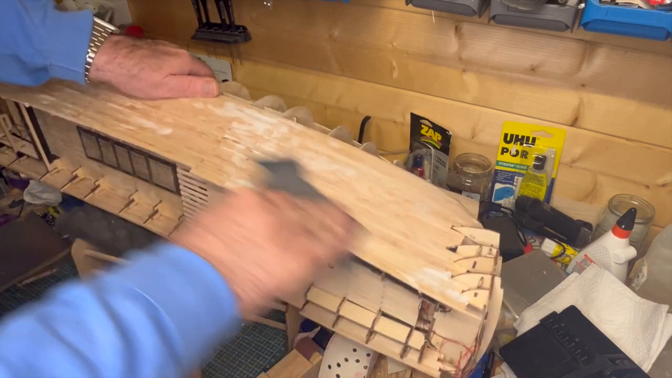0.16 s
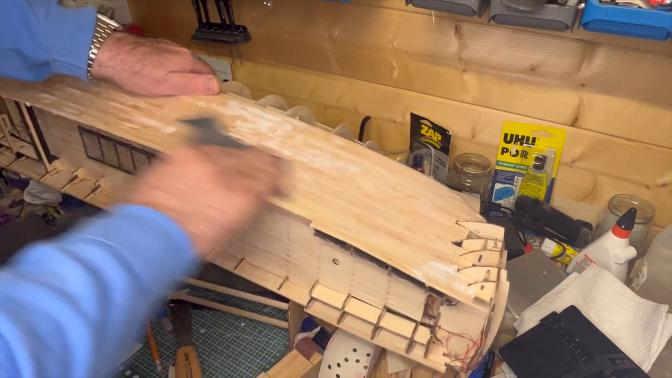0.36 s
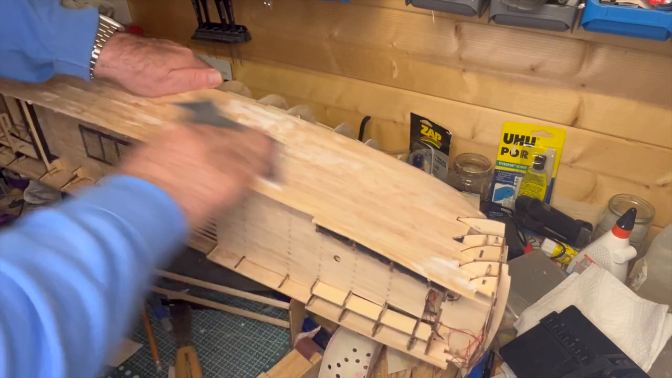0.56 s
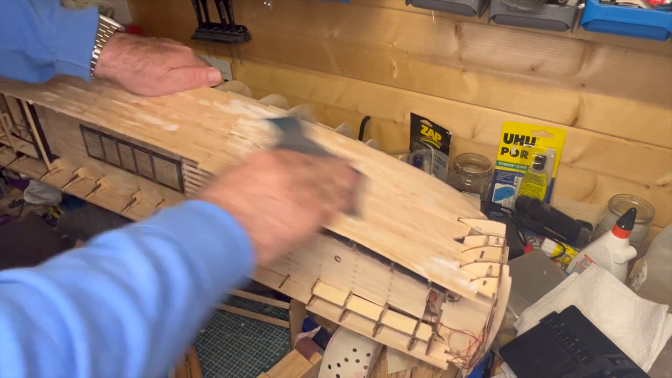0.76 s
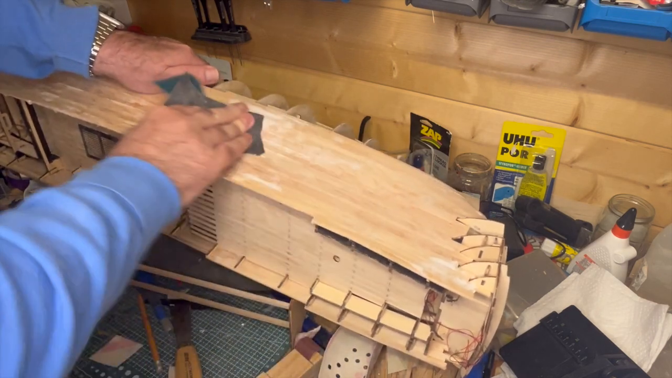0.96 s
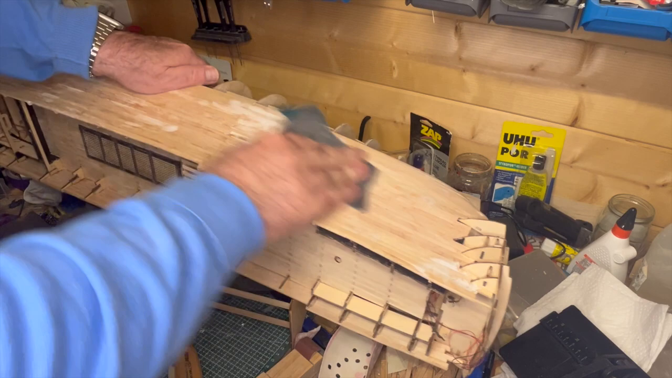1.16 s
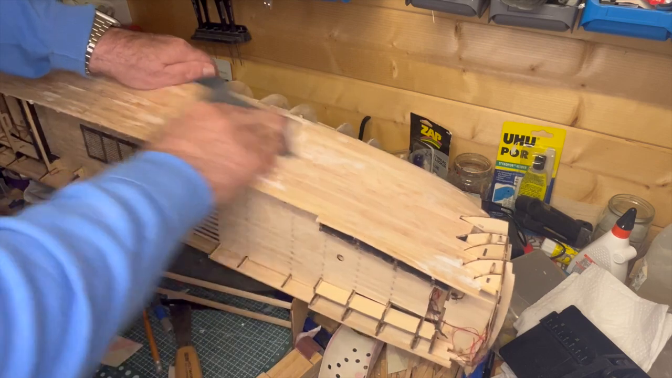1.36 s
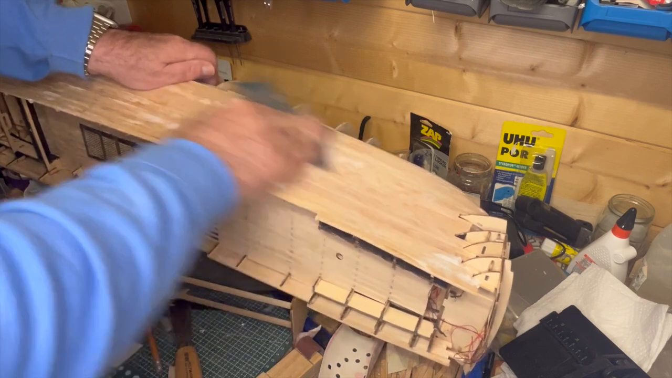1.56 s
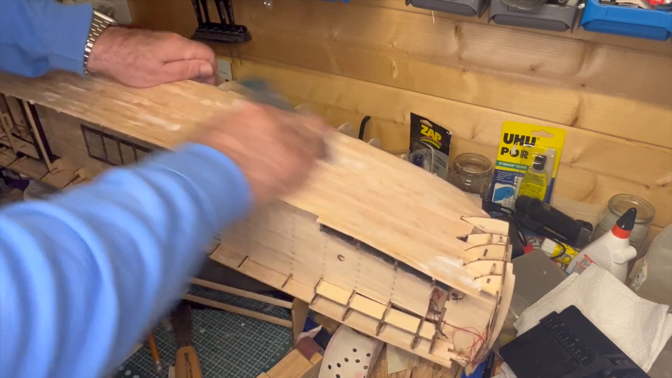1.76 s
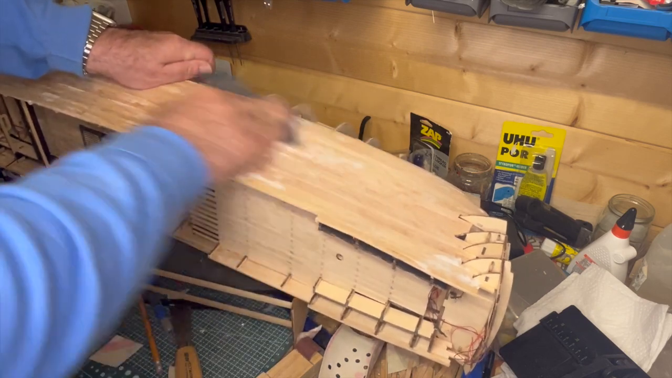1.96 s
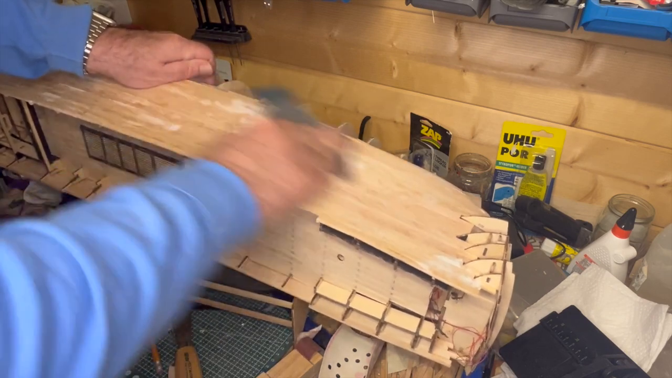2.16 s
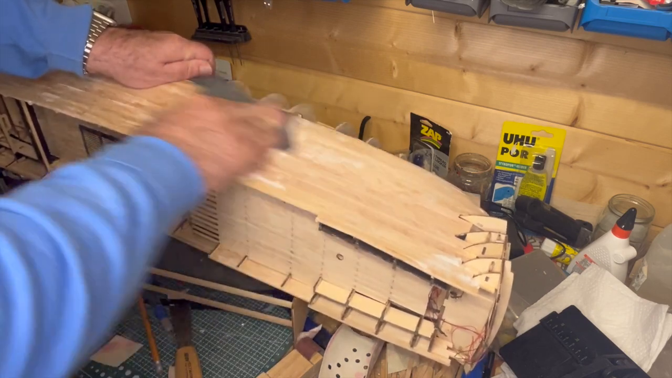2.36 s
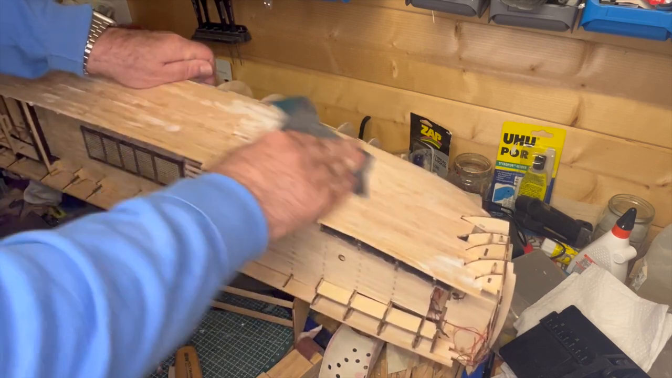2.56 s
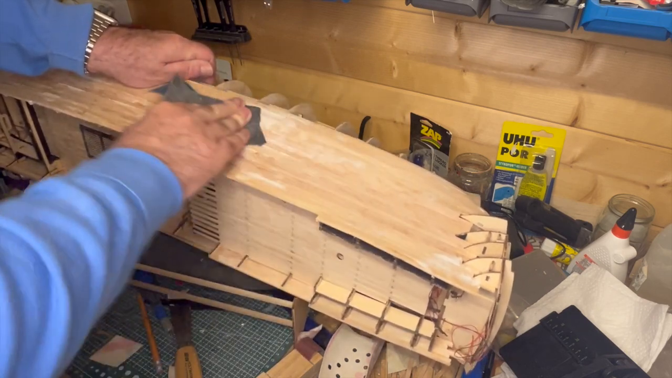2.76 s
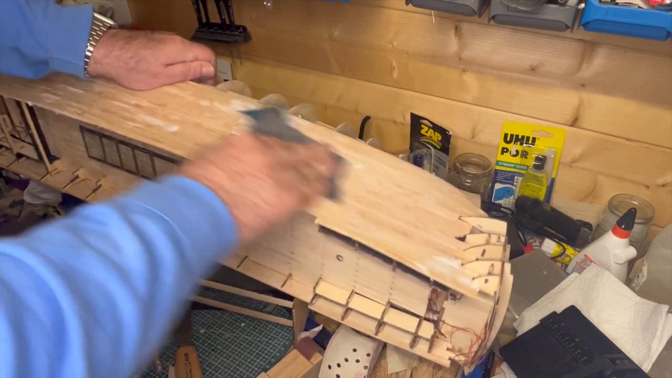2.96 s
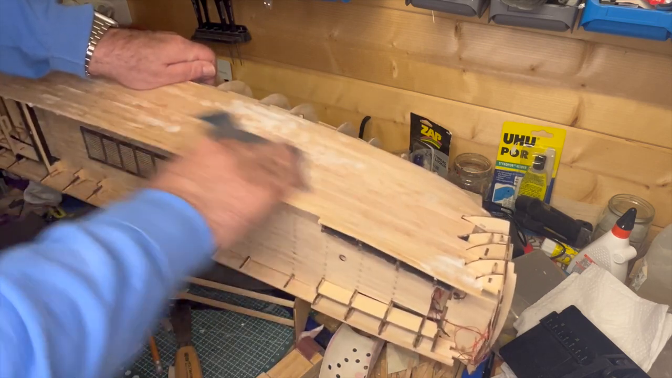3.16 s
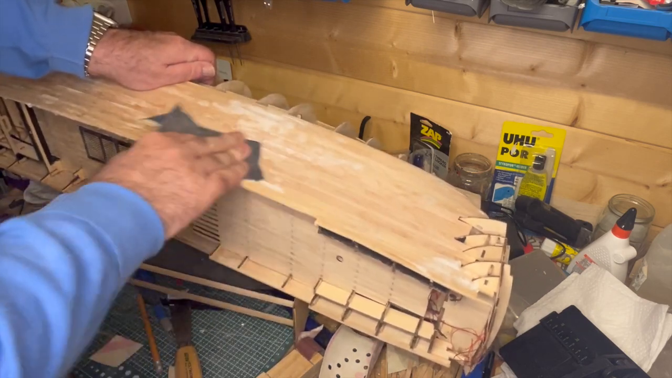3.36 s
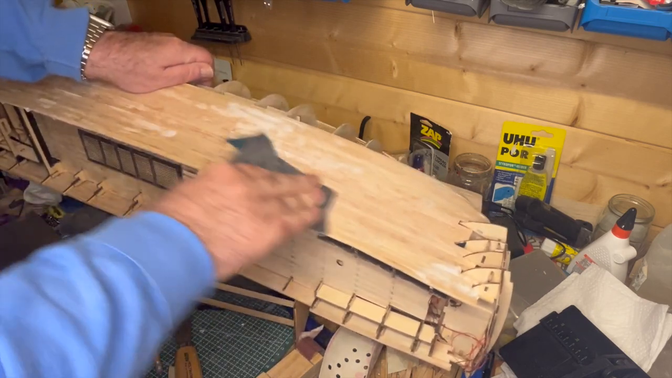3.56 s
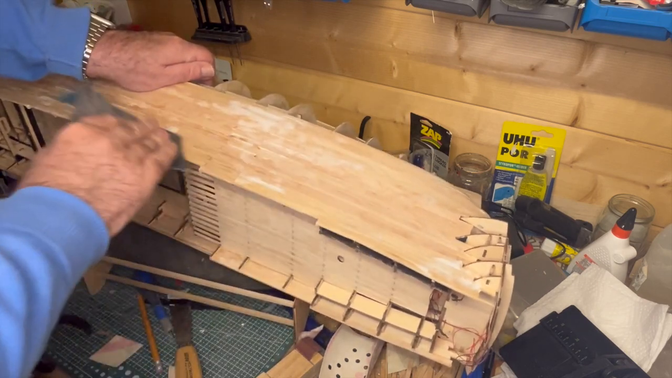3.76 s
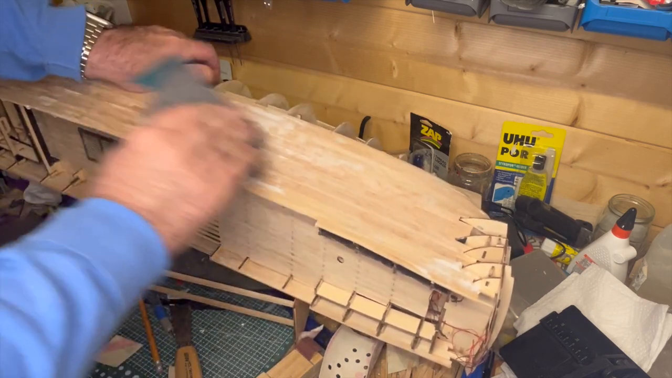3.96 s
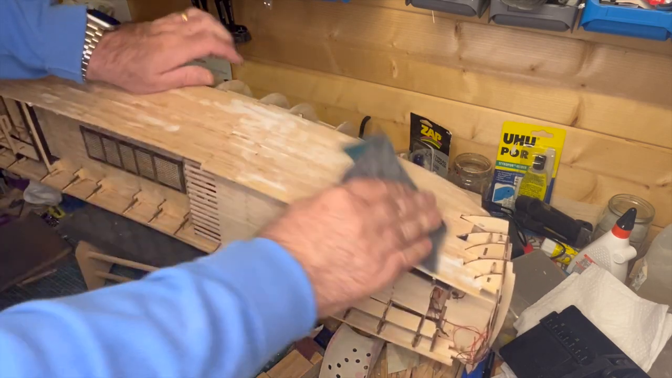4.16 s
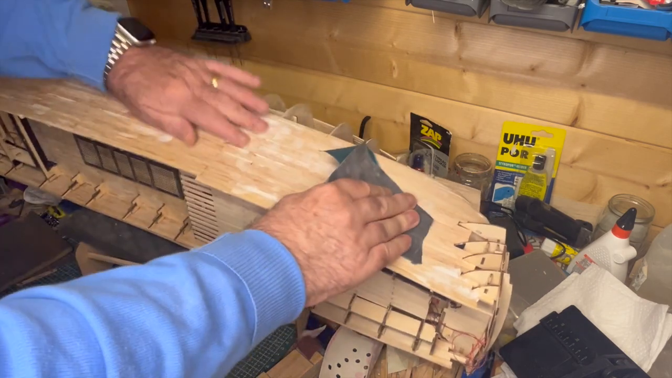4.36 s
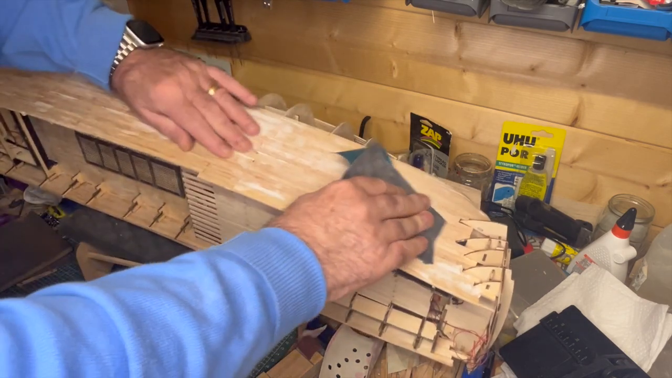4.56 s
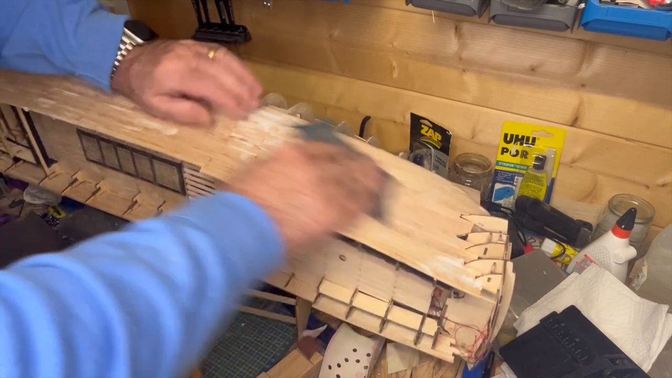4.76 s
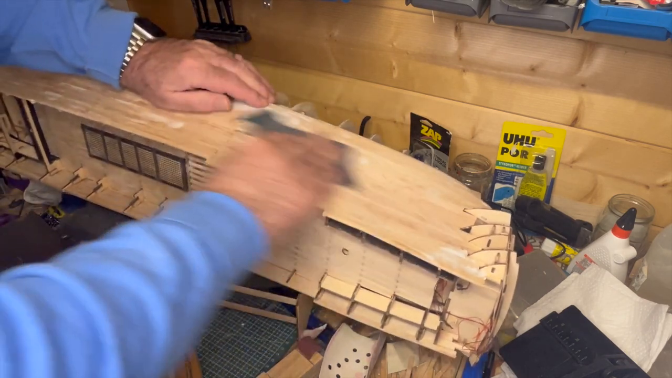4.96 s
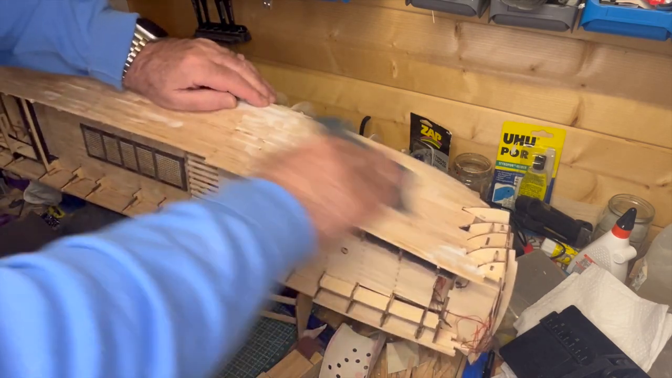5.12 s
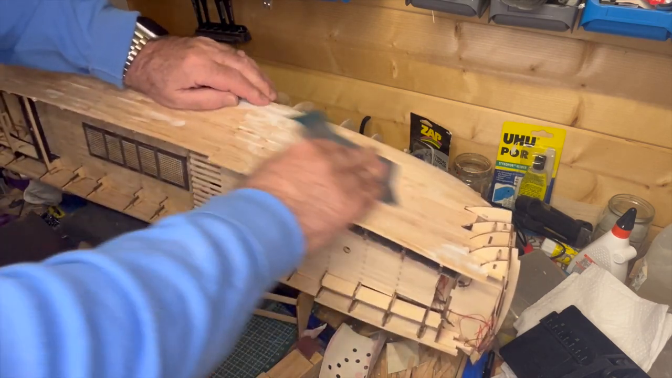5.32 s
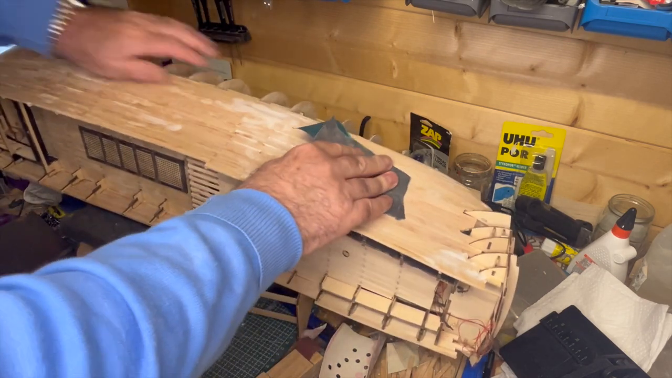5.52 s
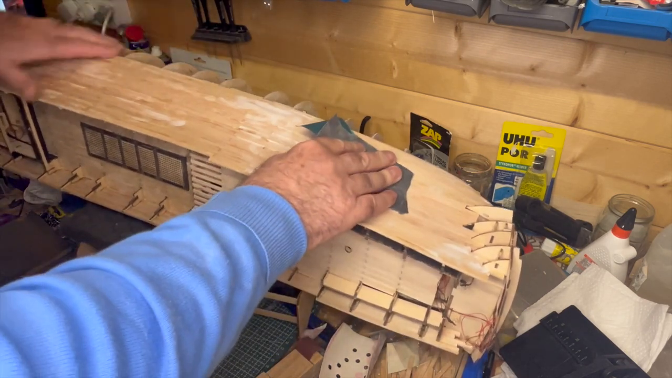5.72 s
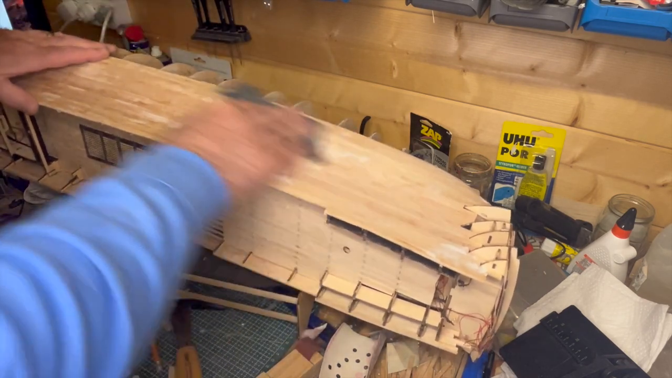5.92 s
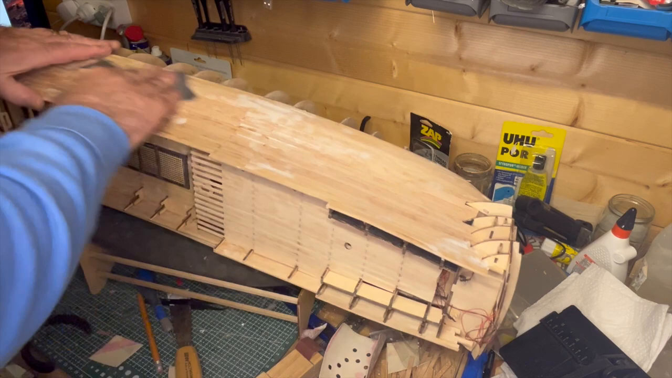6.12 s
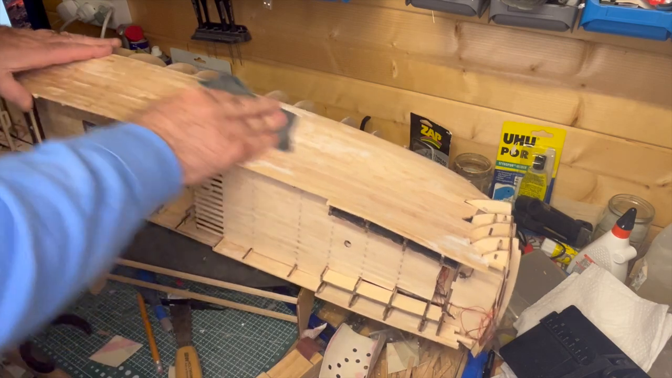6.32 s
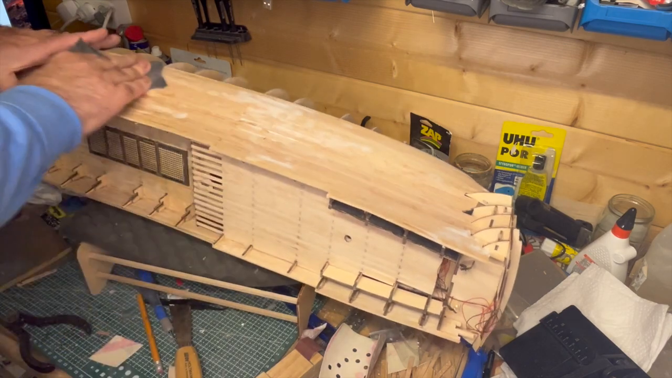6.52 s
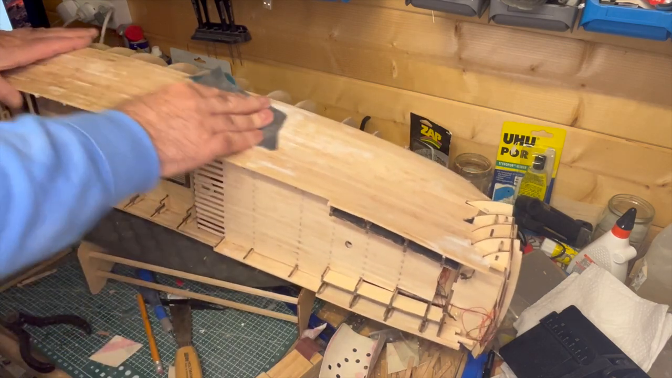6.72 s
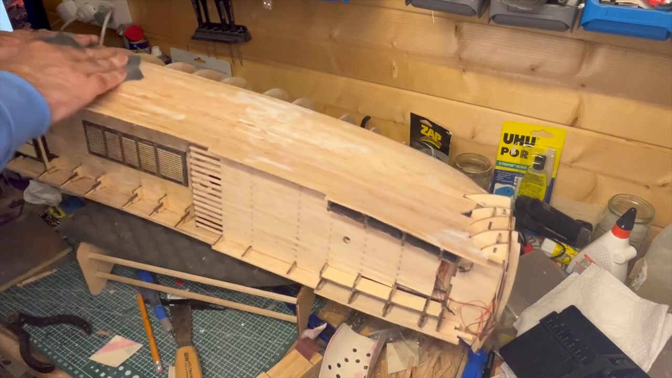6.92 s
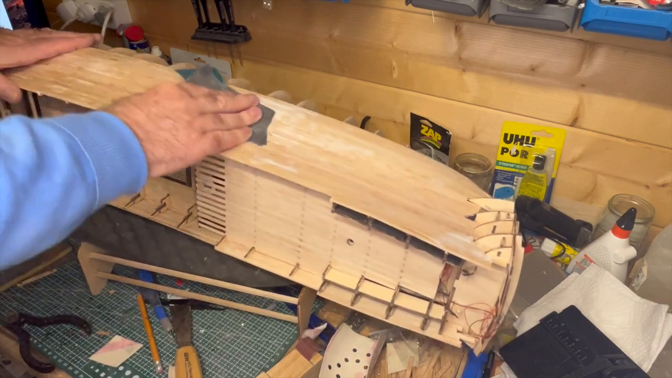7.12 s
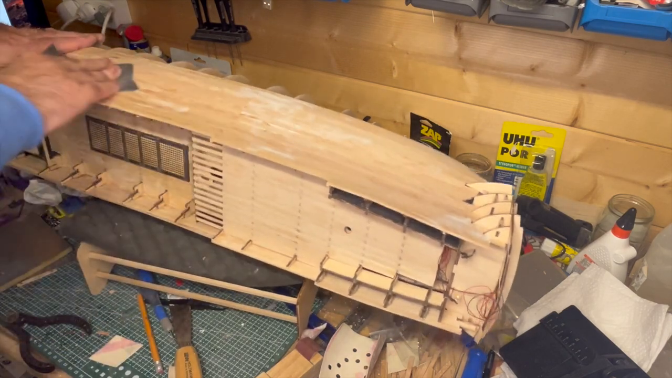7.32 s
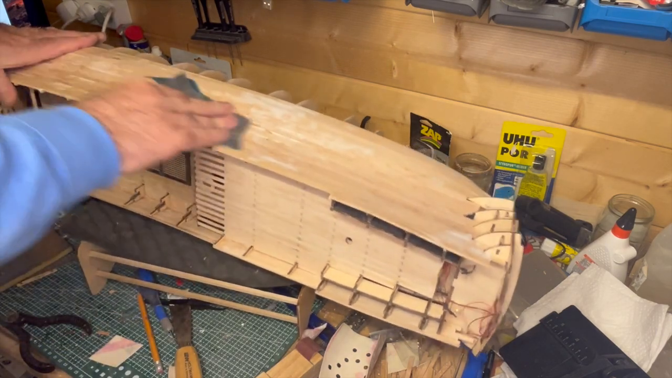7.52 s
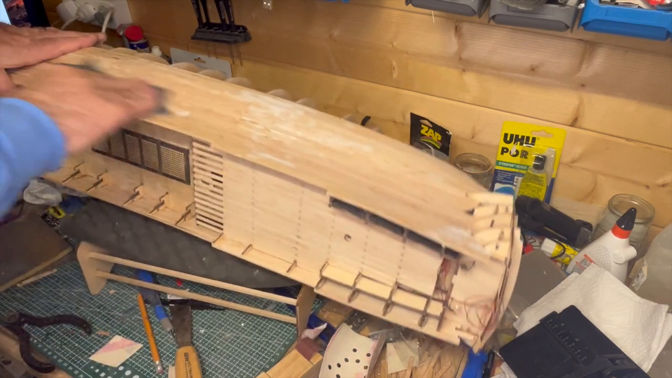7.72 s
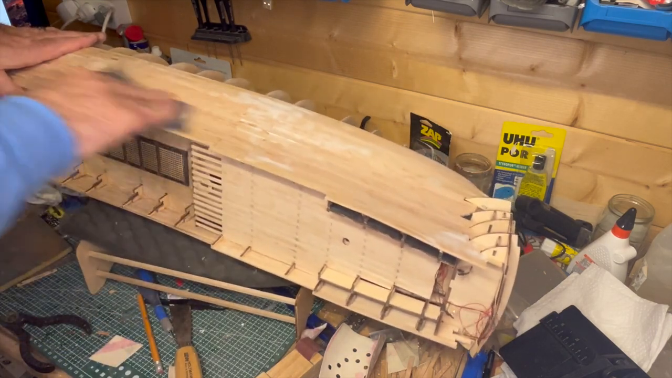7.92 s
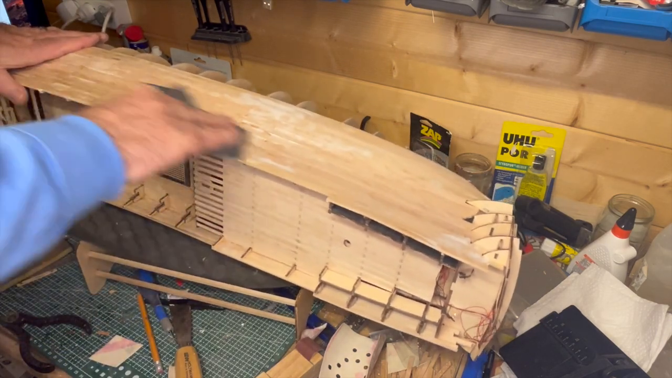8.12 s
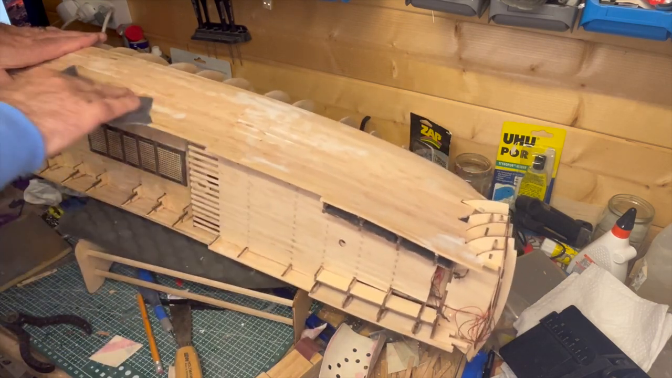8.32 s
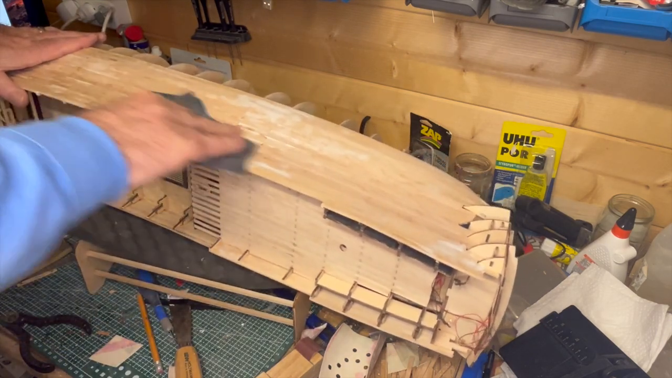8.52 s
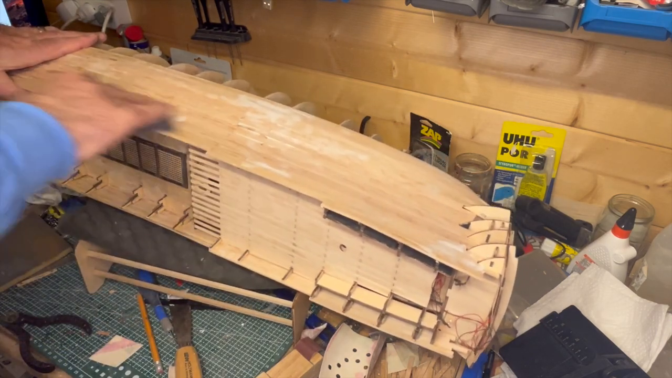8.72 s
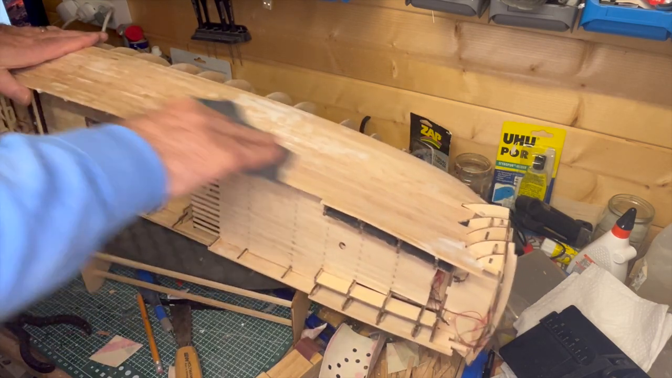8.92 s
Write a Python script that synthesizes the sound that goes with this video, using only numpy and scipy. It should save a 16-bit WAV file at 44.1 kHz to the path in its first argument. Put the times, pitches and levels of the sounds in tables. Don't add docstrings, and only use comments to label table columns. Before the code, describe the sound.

Dry, gritty hand sanding on thin hollow wood: brisk rhythmic swishes with small knocks, two near-silent breaks, then louder strokes that gradually weaken.

```python
import sys
import numpy as np
from scipy import signal
from scipy.fft import rfft, irfft, next_fast_len
from scipy.io import wavfile
from scipy.ndimage import uniform_filter1d, minimum_filter1d, map_coordinates

SR = 44100
rng = np.random.default_rng(int(sys.argv[2]) if len(sys.argv) > 2 else 0)


def convert_level_to_amplitude(level_db):
    exponent = np.asarray(level_db, float) / 20
    return 10 ** exponent


def transcribe(signal):
    frames = np.atleast_2d(signal).T
    limited = np.clip(frames, -1, 1)
    pcm = np.round(limited * 32767).astype(np.int16)
    wavfile.write(sys.argv[1], SR, pcm)


N = 400428

# resonance in Hz, width in Hz, level in dB
RIB_MODES = [(880, 360, 3.5), (1128, 130, 7.5), (1432, 298, 5)]
# resonance in Hz, width in Hz, level in dB
HOLLOW_MODES = [(374, 108, 0.5), (551, 89, 4.5), (764, 190, -3)]
# time in seconds, brightness in dB, contact with the ribs in dB,
# fold of the paper in dB, plank ring in Hz, sheet ring in Hz
HAND_GRIP = [(0.05, 6, -26.5, -8, 2975, 7000), (0.4, 8, -24.5, -4, 2660, 6260),
             (0.56, 3, -36, -9, 2375, 8790), (0.75, 6, -30.5, 0, 2310, 6860),
             (1.1, 10, -36, -9, 3484, 6500), (1.75, 12.5, -25, -18, 3260, 6900),
             (2.05, 8, -31, -19.5, 2453, 7750), (2.45, 11.5, -30.5, -16.5, 2797, 7170),
             (2.85, 4, -29.5, -14, 2260, 7770), (3.3, 1.5, -35.5, -36, 2250, 8520),
             (3.7, 6, -32.5, -31.5, 2690, 8850), (4.4, -7.5, -18, 11.5, 3180, 6330),
             (4.8, 5, -30, -4.5, 3050, 7070), (5.2, 4.5, -24, -11.5, 3225, 6120),
             (7.45, 4, -24, -16.5, 3157, 7250), (8.2, 4, -40, -11, 2830, 8050),
             (8.45, 8.5, -30.5, -5.5, 2726, 8220), (9.0, 6, -34.5, -2, 2175, 6660)]


def unit(x):
    return x / np.sqrt(np.mean(x ** 2) + 1e-20)


def along(points, hz):
    f, v = np.transpose(points)
    return np.interp(np.log(hz + 1), np.log(f + 1), v)


def curves(rows):
    s, *cols = np.transpose(rows)
    return [np.interp(np.arange(N) / SR, s, c) for c in cols]


def wobble(rate):
    return map_coordinates(rng.standard_normal(int(N * rate / SR) + 4), [np.arange(N) * rate / SR])


def filtered(x, response):
    m = next_fast_len(N + SR // 5, real=True)
    return irfft(rfft(x, m) * response(np.fft.rfftfreq(m, 1 / SR)), m)[:N]


def shaped_noise(x, spectrum):
    return unit(filtered(x, lambda hz: convert_level_to_amplitude(along(spectrum, hz))))


def modes(table):
    def response(f):
        total = 0
        for k, (centre, width, db) in enumerate(table):
            total = total + (-1) ** k * convert_level_to_amplitude(db) * 1j * f * width / (centre ** 2 - f ** 2 + 1j * f * width)
        return total
    return response


def scrape(grain_db, patchy_db, ring_hz=1000, width_hz=100, ring_db=-60, size=(6, 22)):
    grains = rng.standard_normal(N) * convert_level_to_amplitude(grain_db * wobble(700))
    hz, t, z = signal.stft(grains, SR, nperseg=512)

    def framed(v):
        return np.interp(t, np.arange(N) / SR, v * np.ones(N))

    field = uniform_filter1d(rng.standard_normal(z.shape), size=size[0], axis=0)
    field = uniform_filter1d(field, size=size[1], axis=1)
    detune = 2 * (hz[:, None] - framed(ring_hz)) / width_hz
    ring = 1 + convert_level_to_amplitude(framed(ring_db)) / (1 + detune ** 2)
    return signal.istft(z * ring * convert_level_to_amplitude(framed(patchy_db) * unit(field)), nperseg=512)[1][:N]


def bursts(rows):
    t, out = np.arange(4000) / SR, np.zeros(N + 4000)
    for s, db, t60 in rows:
        fade = convert_level_to_amplitude(db - 60 * t / t60) * (1 - np.exp(-t / 0.002))
        out[round(s * SR):][:4000] += fade * rng.standard_normal(4000)
    return out[:N]


def swells(rows):
    out = np.zeros(N)
    for start, end, db, top, pointed in rows:
        at = np.arange(max(int(start * SR) + 1, 0), min(int(end * SR), N))
        part = np.clip((at / SR - start) / (end - start), 0, 1)
        swing = part ** (np.log(.5) / np.log(np.clip(top, .1, .9)))
        out[at] += convert_level_to_amplitude(db) * np.abs(np.sin(np.pi * swing)) ** pointed
    return out


def ringing(rows, q, rough_db):
    out, uneven = np.zeros(N), convert_level_to_amplitude(rough_db * wobble(70))
    for start, end, db, from_hz, to_hz in rows:
        at = slice(int(start * SR), int(end * SR))
        count = at.stop - at.start
        pole = np.exp(-np.pi * 1.5 * (from_hz + to_hz) / 2 / q / SR)
        noise = [1, 1j] @ rng.standard_normal((2, count + SR // 50))
        slow = signal.lfilter([1], np.poly([pole, pole]), noise)[-count:]
        phase = 2 * np.pi * np.cumsum(np.linspace(from_hz, to_hz, count)) / SR
        tone = np.real(slow * np.exp(1j * phase))
        out[at] += convert_level_to_amplitude(db) * np.sin(np.linspace(0, np.pi, count)) ** 0.93 * unit(tone)
    return out * uneven


def waking(force):
    span = int(0.05 * SR)
    past = np.abs(uniform_filter1d(force, size=span, origin=(span - 1) // 2))
    return np.clip(1.61 * past / (force + 1e-7), 0, 1) ** 1.3


def strokes():
    # start in seconds, end in seconds, peak in dB, place of top speed 0-1, pointedness
    light_strokes = [(-0.04, 0.1, -34, 0.76, 0.61), (0.112, 0.293, -38, 0.77, 0.52),
                     (0.31, 0.455, -40.5, 0.78, 0.74), (0.443, 0.622, -33.5, 0.79, 1.16),
                     (0.636, 0.797, -31, 0.71, 1.2), (0.803, 0.968, -28, 0.66, 3.3),
                     (0.946, 1.151, -34, 0.64, 3.1), (1.169, 1.321, -29.5, 0.54, 2.9),
                     (1.299, 1.495, -35.5, 0.56, 3), (1.485, 1.669, -33.5, 0.68, 3.1),
                     (1.653, 1.851, -42, 0.69, 1.7), (1.888, 2.083, -33.5, 0.56, 4.3),
                     (2.045, 2.228, -38.5, 0.69, 1.17), (2.25, 2.428, -36.5, 0.73, 1.75),
                     (2.402, 2.592, -40, 0.71, 1.7), (2.596, 2.768, -34, 0.72, 2.36),
                     (2.739, 2.913, -36, 0.83, 0.79), (2.92, 3.092, -32.5, 0.73, 2.56),
                     (3.093, 3.225, -36, 0.66, 0.78), (3.216, 3.38, -36, 0.8, 1.36),
                     (3.402, 3.54, -45.5, 0.72, 0.54), (3.53, 3.79, -37, 0.67, 2.63)]
    middle_strokes = [
        (4.188, 4.398, -52.5, 0.38, 9.7),
        (4.421, 4.664, -65, 0.71, 3.3),
        (4.709, 4.885, -29.5, 0.68, 0.48),
        (4.917, 5.073, -30, 0.46, 0.52),
        (5.078, 5.237, -31.5, 0.53, 0.83),
        (5.22, 5.417, -32, 0.49, 3.9),
    ]
    heavy_strokes = [(5.831, 6.098, -24.5, 0.69, 0.9), (6.117, 6.297, -26, 0.45, 1.2),
                     (6.324, 6.507, -26, 0.65, 0.49), (6.546, 6.715, -27.5, 0.44, 0.54),
                     (6.747, 6.941, -26, 0.62, 0.68), (6.952, 7.132, -27.5, 0.52, 0.51),
                     (7.16, 7.33, -25.5, 0.61, 0.94), (7.345, 7.508, -24, 0.52, 0.81),
                     (7.545, 7.682, -24.5, 0.47, 1.06), (7.718, 7.842, -25, 0.56, 0.71),
                     (7.872, 8, -26.5, 0.51, 0.99), (8.032, 8.171, -30, 0.58, 0.68),
                     (8.162, 8.34, -29, 0.57, 2.3), (8.356, 8.512, -35, 0.68, 1.1),
                     (8.522, 8.696, -35.5, 0.52, 2.5), (8.704, 8.895, -29.5, 0.81, 1.3),
                     (8.891, 9.075, -39, 0.63, 2.1)]
    lift_s, lift_db = 0.06, -47
    rows = light_strokes + middle_strokes + heavy_strokes
    slides = []
    for row, last in zip(rows, rows[:1] + rows):
        lifted = abs(row[0] - last[1]) > lift_s or last[2] < lift_db
        turn = row[0] if lifted else last[1]
        slides.append((turn - .002, row[1] + 0.0015, row[2] - 18, .55, .9))
    force = swells(rows)
    resting = minimum_filter1d(uniform_filter1d(force, size=6000), size=5000)
    return force, swells(slides) + convert_level_to_amplitude(-35.0) * resting


def bench(force):
    # frequency in Hz, level in dB per Hz
    rumble_spectrum = [(12, 4), (27, -1), (76, -15), (102, -10), (125, -21.5), (200, -22), (260, -25),
                       (400, -87)]
    hush_spectrum = [(16, 11.5), (88, -18.5), (276, -25), (1610, -29), (2050, -38), (6000, -33),
                     (12000, -39), (14000, -93)]
    # middle in seconds, peak in dB, length in seconds
    rock_rows = [(0.04, -52.5, 0.11), (0.197, -51, 0.16), (0.426, -53.5, 0.25), (0.57, -51.5, 0.089),
                 (0.964, -48.5, 0.24), (1.251, -45.5, 0.094), (1.443, -55, 0.061), (1.632, -64, 0.72),
                 (1.99, -48, 0.21), (2.383, -57.5, 0.53), (2.8, -54.5, 0.4), (3.042, -46, 0.18),
                 (3.173, -45, 0.13), (3.538, -54.5, 0.34), (3.943, -56, 0.25), (4.302, -60.5, 0.17),
                 (4.877, -58, 0.11), (5.15, -58, 0.18), (5.589, -64.5, 0.5), (6.04, -62, 0.068),
                 (6.722, -57, 0.29), (6.934, -51, 0.069), (7.204, -46, 0.16), (7.59, -76, .12),
                 (7.712, -49, 0.042), (7.882, -52.5, 0.094), (8.5, -49.5, 0.31), (8.718, -47, 0.14),
                 (9.003, -59.5, 0.24)]
    shake = convert_level_to_amplitude(-70) * (uniform_filter1d(force, size=13000) / convert_level_to_amplitude(-35.0) + convert_level_to_amplitude(-67.5))
    rocks = swells([(s - 0.64 * length, s + 0.57 * length, db, .5, 2.2) for s, db, length in rock_rows])
    rumble = unit(convert_level_to_amplitude(0.83 * wobble(4.8)) * shaped_noise(rng.standard_normal(N), rumble_spectrum))
    hush = shaped_noise(rng.standard_normal(N), hush_spectrum)
    return (shake + rocks) * rumble + convert_level_to_amplitude(-66) * hush


def shed(x):
    # frequency in Hz, decay t60 in seconds
    wall_decay = [(200, 0.076), (2000, 0.033), (10000, 0.036)]
    hz, t, z = signal.stft(rng.standard_normal(SR // 3), SR, nperseg=256)
    tail = signal.istft(z * convert_level_to_amplitude(-60 * t / along(wall_decay, hz)[:, None]), SR, nperseg=256)[1]
    return signal.fftconvolve(np.pad(x, (300, 0)), tail / np.linalg.norm(tail))[:N]


def brushes():
    # start in seconds, end in seconds, peak in dB, from Hz, to Hz
    brush_rows = [(3.81, 4.03, -81.5, 3300, 3400), (3.83, 4.02, -89, 2300, 2500),
                  (3.83, 4.02, -84, 1600, 1600), (4.2, 4.4, -72, 700, 920), (4.15, 4.36, -65.5, 1150, 1100),
                  (4.22, 4.38, -65, 3200, 2400), (4.16, 4.44, -70.5, 1600, 1550),
                  (4.31, 4.45, -75.5, 4200, 5200), (4.2, 4.43, -72, 1900, 2200),
                  (4.18, 4.26, -62.5, 3800, 3950), (4.52, 4.66, -79, 1600, 1600),
                  (5.41, 5.53, -63.5, 510, 850), (5.41, 5.52, -64.5, 1000, 830),
                  (5.39, 5.5, -84, 1200, 1800), (5.74, 5.87, -75, 2500, 2700),
                  (5.74, 5.86, -79, 3800, 3800), (5.75, 5.87, -69.5, 1100, 1000),
                  (4.68, 4.73, -87, 1200, 1000)]
    return ringing(brush_rows, q=9, rough_db=0.0)


def knocks():
    # time in seconds, peak in dB, hollow share in dB, decay t60 in seconds
    knock_rows = [(0.376, -39, -23, 0.22), (0.932, -40, -12, 0.16), (1.241, -54, -28, 0.21),
                  (1.349, -53, -5, 0.08), (1.991, -55, -16, 0.014), (2.026, -36.5, -10, 0.07),
                  (2.285, -65, 5, 0.024), (2.659, -70, 19, 0.082), (2.998, -55.5, 12.5, 0.14),
                  (3.78, -49, -30, 0.044), (4.096, -67, 6, 0.024), (5.087, -36.5, -30, 0.097),
                  (5.193, -31, -22, 0.1), (5.75, -62.5, -13, 0.16), (6.338, -57.5, 15.5, 0.14),
                  (6.764, -35.5, 2.5, 0.2), (6.932, -17.5, -9, 0.077), (7.693, -40.5, 2, 0.19),
                  (8.435, -45.5, 4.5, 0.14), (8.855, -48.5, 9, 0.06)]
    # time in seconds, peak in dB
    snap_rows = [
        (2.026, -14.5),
        (4.098, -70),
        (4.853, -20),
        (5.087, -36),
        (5.1929, -7.5),
        (7.794, -15.5),
        (6.9311, -5),
    ]
    rib_hits = bursts([(s - .001, db + 6.0, t60) for s, db, _, t60 in knock_rows])
    hollow_hits = bursts([(s - .001, db + low_db + 19.0, 0.5 * t60) for s, db, low_db, t60 in knock_rows])
    body = filtered(rib_hits, modes(RIB_MODES)) + filtered(hollow_hits, modes(HOLLOW_MODES))
    padded = filtered(body, lambda hz: 1 / (1 + 1.4j * hz / 1700 - (hz / 1700) ** 2))
    snaps = bursts([(s - .001, db + 4.0, .028) for s, db in snap_rows])
    sheet = modes([(3200, 1700, -7.0), (6210, 2840, 2.0), (8310, 3000, 2.5), (11900, 1900, -5.5)])
    return padded + filtered(snaps, sheet)


def taps():
    # time in seconds, then rib, side and hollow ring in dB
    tap_rows = [(0.9305, -28, -33, -55), (2.0255, -27.5, -42.5, -51), (4.0973, -72, -73, -69),
                (5.1922, -25, -26.5, -52), (6.7627, -35, -32, -36), (6.768, -46, -36, -50),
                (6.777, -50, -40, -42), (6.805, -50, -34, -34), (6.931, -14.5, -23, -47),
                (6.9355, -26, -23, -33), (6.9405, -31, -32, -23), (7.692, -32, -51, -50),
                (7.6955, -59, -26.5, -55), (7.7, -48, -23.5, -29.5), (7.7115, -49, -31, -56)]
    # mode in Hz, decay t60 in seconds
    hull_modes = [
        (1400, 0.027),
        (771, 0.038),
        (557, 0.038),
    ]
    t, out = np.arange(3000) / SR, np.zeros(N)
    for s, *levels in tap_rows:
        for db, (hz, t60) in zip(levels, hull_modes):
            tone = convert_level_to_amplitude(db - 60 * t / t60) * np.sin(2 * np.pi * hz * t)
            out[round(s * SR):][:3000] += tone * (1 - np.exp(-t / 0.001))
    return out


def brief_rings():
    # start in seconds, end in seconds, peak in dB, pitch in Hz
    steady_rings = [(0.036, 0.12, -55, 1148), (0.204, 0.287, -52.5, 1400), (0.364, 0.438, -51.5, 818),
                    (0.55, 0.639, -63, 1495), (0.701, 0.77, -54, 1510), (3.88, 4.003, -74.5, 565),
                    (1.006, 1.117, -57.5, 1520), (1.231, 1.288, -46, 1588), (1.581, 1.667, -58, 1290),
                    (2.107, 2.202, -61.5, 1570), (2.462, 2.556, -54.5, 1480), (2.684, 2.792, -57, 1446),
                    (2.807, 2.935, -54, 1523), (2.825, 2.92, -52.5, 1900), (3.003, 3.104, -51, 2390),
                    (3.648, 3.775, -48, 2684), (3.652, 3.755, -48, 5000), (3.746, 3.813, -52, 1070),
                    (8.497, 8.615, -60, 2320), (8.71, 8.846, -62.5, 1167), (8.846, 8.891, -43.5, 1940),
                    (8.847, 8.897, -46, 1106), (8.957, 9.046, -55.5, 2190), (3.598, 3.769, -42, 8470),
                    (5.732, 5.84, -68, 1490), (5.736, 5.787, -69, 584), (8.348, 8.422, -60.5, 1085),
                    (7.704, 7.86, -65, 2690)]
    # start in
    # seconds, end in seconds, peak in dB, from Hz, to Hz
    sliding_rings = [(0.12, 0.296, -53, 3920, 3980), (0.182, 0.305, -57, 2760, 2820),
                     (0.295, 0.389, -58, 1450, 1455), (0.363, 0.468, -67, 3900, 3900),
                     (0.355, 0.457, -54, 2720, 2670), (0.491, 0.627, -63, 2290, 2280),
                     (0.501, 0.637, -67, 812, 818), (0.67, 0.807, -54, 1904, 2504),
                     (0.7, 0.794, -46.5, 3980, 3950), (1.012, 1.14, -62, 1980, 2240),
                     (1.19, 1.324, -67, 2070, 2000), (1.224, 1.318, -60, 850, 776),
                     (1.333, 1.411, -55, 435, 445), (1.37, 1.464, -64, 786, 927),
                     (1.928, 2.168, -60.5, 2575, 2496), (1.962, 2.07, -56, 1400, 1400),
                     (2.316, 2.421, -55, 4120, 4320), (2.657, 2.778, -63, 4330, 4400),
                     (2.758, 2.916, -56.5, 2340, 2190), (3.095, 3.244, -60, 2240, 2295),
                     (3.1, 3.244, -66.5, 1400, 1530), (3.26, 3.392, -50.5, 2155, 2506),
                     (4.51, 4.653, -73, 3140, 3200), (6.98, 7.054, -44.5, 1500, 1473),
                     (7.203, 7.336, -51, 1554, 1434), (7.202, 7.325, -46.5, 2770, 2740),
                     (7.381, 7.493, -40, 4270, 3010), (7.413, 7.503, -44, 1476, 1466),
                     (7.53, 7.687, -53, 1527, 1463), (4.93, 5.075, -69, 3200, 3550),
                     (4.714, 4.864, -60, 900, 839), (2.048, 2.198, -46.5, 8580, 8470),
                     (5.897, 6.083, -49, 3350, 3200),
                     (7.54, 7.69, -47.5, 3200, 2000), (7.69, 7.86, -49.5, 1200, 1480),
                 (7.69, 7.86, -51, 2850, 2300), (7.72, 7.86, -71, 3000, 3500),
                 (7.76, 7.85, -50.5, 620, 580), (7.86, 8.01, -57, 1450, 1400),
                 (7.86, 8.01, -50, 3600, 2500), (7.88, 8.0, -50.5, 2800, 2100),
                 (8.01, 8.18, -65, 2850, 5700), (8.03, 8.18, -67, 1420, 1450),
                 (8.05, 8.18, -49.5, 3800, 4300), (8.06, 8.17, -62.5, 600, 590),
                 (8.18, 8.35, -52, 2500, 2800), (8.19, 8.34, -61, 1500, 1450), (8.2, 8.34, -62, 2600, 2400),
                 (7.52, 7.68, -81, 620, 500), (3.2, 3.42, -66, 380, 440), (2.96, 3.12, -63, 360, 330),
                 (3.38, 3.55, -74, 2500, 1800), (1.95, 2.1, -60.5, 300, 330), (3.6, 3.8, -66, 1400, 1200),
                 (0.86, 0.96, -50.5, 4800, 4200), (0.0, 0.092, -55, 2750, 2800),
                 (0.0, 0.092, -59, 3950, 4500), (4.835, 4.9, -57, 290, 323), (5.27, 5.33, -64, 190, 240),
                 (5.2, 5.235, -53.5, 330, 430), (4.98, 5.09, -53, 900, 920), (4.76, 4.9, -51.5, 2400, 2200),
                 (8.55, 8.67, -53.5, 5300, 3200), (8.56, 8.67, -60, 2600, 4100),
                 (8.43, 8.51, -51.5, 2850, 2800), (8.85, 8.91, -62, 320, 370), (8.5, 8.6, -63, 480, 550),
                 (0.35, 0.46, -42, 6300, 6700), (6.93, 6.948, -28.5, 1147, 990),
                 (0.52, 0.62, -45, 13000, 6400)]
    steady = [(*row, row[-1]) for row in steady_rings]
    return ringing(steady + sliding_rings, q=15, rough_db=2.5)


def wood(force, slide):
    # resonance in Hz, width in Hz, level in dB
    plank_modes = [(2270, 900, -1.5), (3980, 1220, 1.5)]
    # start in seconds, end in seconds, peak in dB, place of top 0-1, pointedness
    creep_rows = [(-0.05, 0.44, -53.5, 0.81, 1.1), (1.33, 1.48, -64, 0.2, 2.1),
                  (1.55, 1.88, -55.5, 0.53, 3.1), (1.89, 2.05, -58, 0.8, 0.58),
                  (2.26, 2.47, -63, 0.15, 0.35), (2.655, 2.93, -56.5, 0, 0.51),
                  (2.985, 3.5, -59.5, 0, 0.27), (3.62, 3.83, -59.5, 0.59, 1.47),
                  (4.17, 4.45, -71.5, 0.3, 1.3), (4.8, 4.98, -66, 0.66, 1.4), (5.25, 5.5, -64, 0.89, 0.9),
                  (6.5, 6.74, -51, 0.47, 0.28), (6.74, 6.86, -47, 0.57, 4.6), (7.3, 7.55, -49, 0.3, 0.79),
                  (7.7, 7.86, -67, 0.25, 4), (8.38, 8.62, -62, 0.53, 1), (8.78, 8.95, -55.5, 0.48, 0.92),
                  (8.95, 9.1, -68, 0.35, 0.89)]
    bright_db, ribs_db, _, plank_hz, _ = curves(HAND_GRIP)
    pressure = uniform_filter1d(force, size=9000) + convert_level_to_amplitude(-95.5)
    light = 1 / (1 + (pressure / convert_level_to_amplitude(-34)) ** 2)
    patches = 2.2 + 2.6 * light
    past = np.abs(uniform_filter1d(force, size=9000, origin=4499))
    drive = uniform_filter1d(force, size=1500) + convert_level_to_amplitude(-7.0) * slide + np.minimum(pressure, 2 * past)

    plank_grit = scrape(1.1, patches, ring_hz=plank_hz, width_hz=250, ring_db=-9 + 7 * light)
    planks = unit(filtered(plank_grit, modes(plank_modes)))
    rib_grit = scrape(2.3, patches, ring_hz=1400 + 150 * wobble(2.4), width_hz=83,
                      ring_db=-18.5 + 7.1 * light + 1.5 * wobble(6.9))
    ribs = unit(filtered(rib_grit, modes(RIB_MODES)))
    hollow = unit(filtered(scrape(4.5, patches), modes(HOLLOW_MODES)))
    hum = unit(filtered(hollow, modes(HOLLOW_MODES)))

    planks_db = -16.5 - 1.48 * np.maximum(bright_db - 3.5, 0)
    scratch = convert_level_to_amplitude(2.1 * wobble(45))
    shell = scratch * (force * waking(force) + 0.33 * drive) * convert_level_to_amplitude(planks_db) * planks
    shell = shell + convert_level_to_amplitude(ribs_db + 1.0) * drive * ribs
    loose = 1.2 / (1 + convert_level_to_amplitude(11.0 * (ribs_db + 32)))
    shell = shell - loose * filtered(shell, lambda hz: 1 / (1 + ((hz - 1880) / 230) ** 4))
    return shell + convert_level_to_amplitude(ribs_db - 11.5) * drive * hollow + swells(creep_rows) * hum


def paper(force, slide):
    # frequency in Hz, level in dB per Hz
    grit_spectrum = [(2710, -42), (4600, 2.5), (6110, 7.5), (7590, 2), (8680, 2.5), (9380, -3), (12000, 0),
                     (14400, -2), (15700, -14), (15950, -71)]
    drag_spectrum = [(1200, -31.5), (2000, -11.5), (4000, -8), (6300, 0), (9000, -2), (15400, -1.5),
                     (15950, -73.5)]
    bright_db, _, fold_db, _, sheet_hz = curves(HAND_GRIP)
    upper = 1 / (1 + np.exp((7550 - sheet_hz) / 110))
    grit = scrape(grain_db=0.68, patchy_db=2.2, ring_hz=6400 + 2200 * upper, width_hz=1180,
                  ring_db=1.5 + 0.25 * bright_db + 2.8 * upper, size=(9, 13))
    hiss = shaped_noise(grit, grit_spectrum)
    top = filtered(hiss, lambda hz: 1 / (1 + (9400 / (hz + 1)) ** 12))
    under = filtered(hiss, lambda hz: 1 / (1 + (hz / 5600) ** 10))
    fold = unit(filtered(grit, lambda hz: modes([(4050, 450, 0)])(hz) ** 2))
    dull = shaped_noise(scrape(grain_db=3.0, patchy_db=2), drag_spectrum)

    late = waking(force)
    feather = 1 / (1 + (uniform_filter1d(force, size=9000) / convert_level_to_amplitude(-48.0)) ** 2)
    lean = convert_level_to_amplitude((bright_db + 8.0 - 4.5 * feather) / 2)
    body = hiss - top - (1 - late) * under
    bite = top * lean + body / lean + late * convert_level_to_amplitude(fold_db - 13.5) * fold
    flutter = convert_level_to_amplitude(4.0 + 1.25 * wobble(34) + 0.66 * wobble(140))
    return force * flutter * bite + slide * convert_level_to_amplitude(-6 * feather) * dull


def scene():
    force, slide = strokes()
    work = brushes() + knocks() + taps() + brief_rings() + wood(force, slide) + paper(force, slide)
    return np.tile(bench(force) + convert_level_to_amplitude(-14.0) * shed(work) + work, (2, 1))


def top_cut(x):
    return signal.sosfilt(signal.butter(12, 16480, fs=SR, output="sos"), x)


def record(dry):
    level = np.sqrt(np.abs(uniform_filter1d(dry[0] ** 2, size=700)))
    gated = dry[0] * (0.37 + 0.85 * level / (level + convert_level_to_amplitude(-57)))

    def colour(hz):
        echo_dip = 1 - 0.052 / (1 + ((hz - 1880) / 130) ** 2)
        return echo_dip * (hz < 16050)

    return top_cut(np.tile(filtered(gated, colour), (2, 1)))


dry = scene()
out = record(dry)
transcribe(out)
```